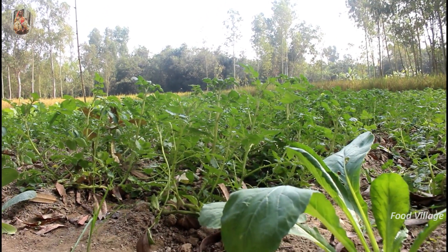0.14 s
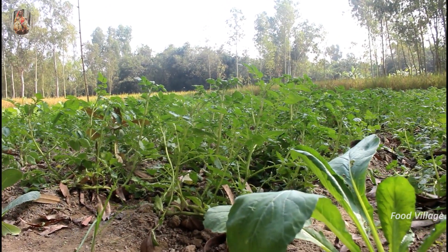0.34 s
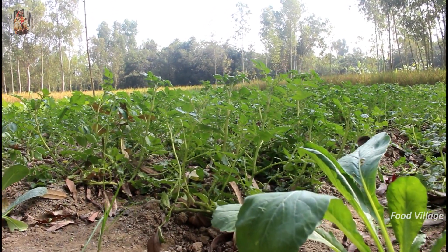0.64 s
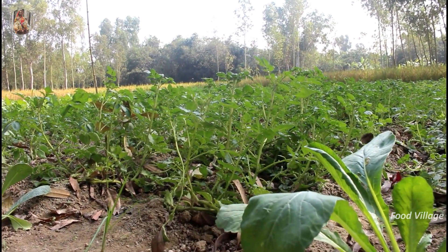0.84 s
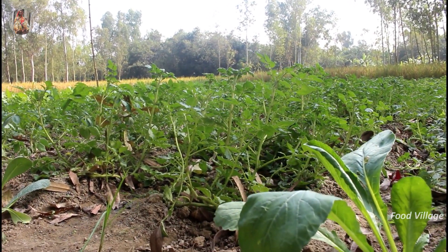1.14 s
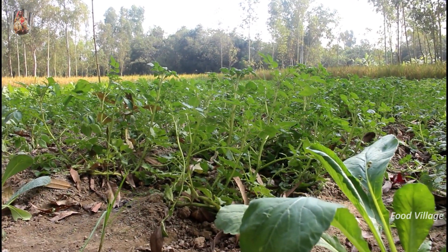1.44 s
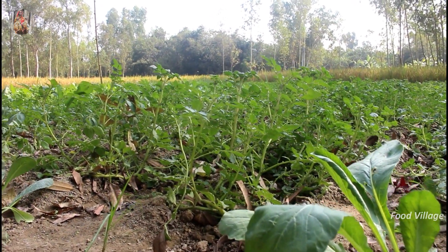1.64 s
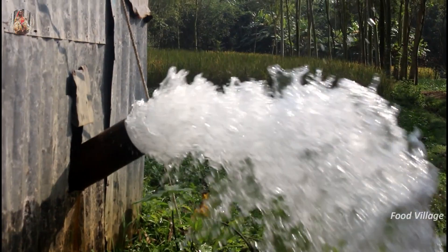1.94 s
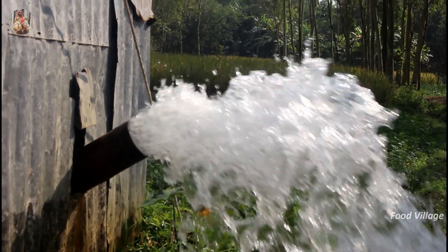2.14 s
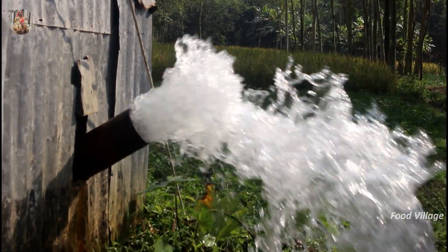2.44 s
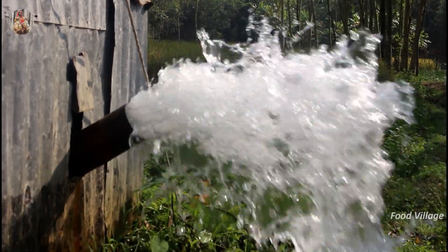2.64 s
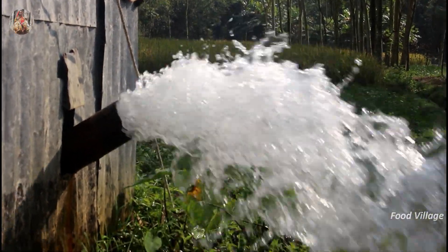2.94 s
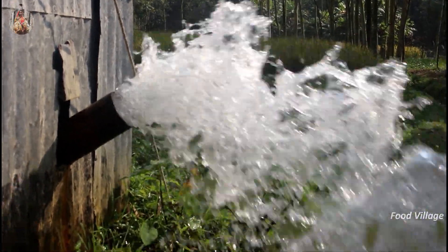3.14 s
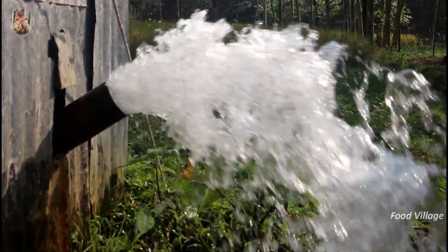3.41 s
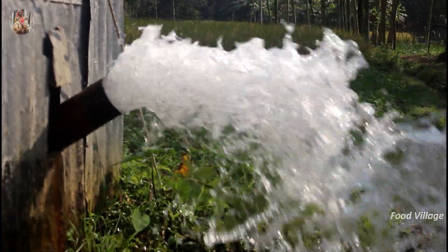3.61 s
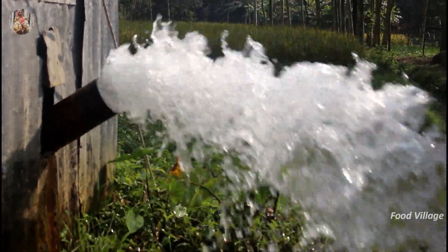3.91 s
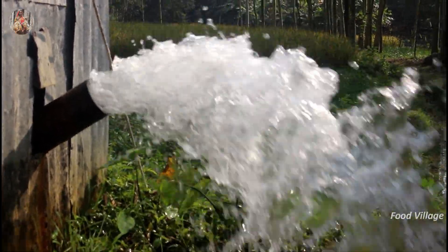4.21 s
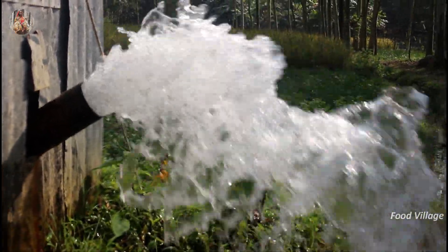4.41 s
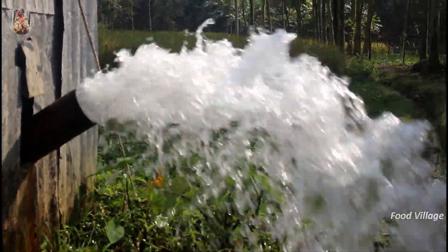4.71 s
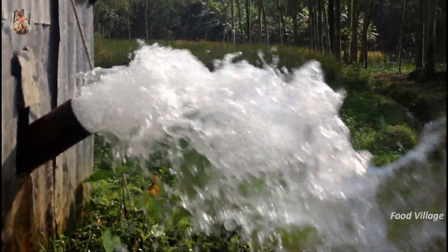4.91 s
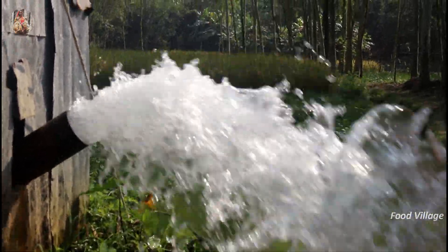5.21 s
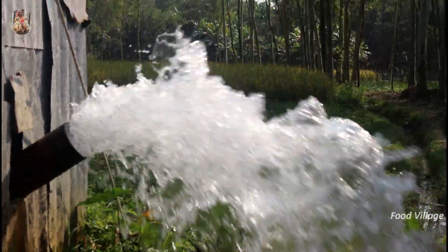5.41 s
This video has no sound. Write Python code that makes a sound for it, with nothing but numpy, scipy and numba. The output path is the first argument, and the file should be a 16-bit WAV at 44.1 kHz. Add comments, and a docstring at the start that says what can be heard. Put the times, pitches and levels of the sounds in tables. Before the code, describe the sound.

For the first 1.6 seconds the sound is very quiet: a soft rush over an open field and an electric pump humming far away. A loose part clatters lightly and rapidly on it, with a thin, high squeal, and a few faint bird chirps come between 0.3 and 1 second.

At 1.6 seconds everything cuts to silence. At about 1.7 seconds loud, close water starts abruptly, gushing from a pipe into a ditch. It roars and hisses in quick, uneven surges, full of bubbling and sharp wet slaps, over the pump's steady low hum. Stronger slaps stand out around 3 and 5.3 seconds. From roughly 3.7 to 4.8 seconds a gust of wind buffets the microphone with low thumps and flutter. The water and hum carry on without easing until the end, at about 5.6 seconds. The whole sound is louder on the left.

```python
"""First an electric irrigation pump hums far off across a field. A loose part clatters on its casing once
a turn, with a thin squeal and faint chirps. At 1.6 s comes a short silence. Then, close by, the pipe
gushes in surges into a ditch, hissing, bubbling and slapping over the hum of the impeller (the wheel that
drives the water). Around 4 s a gust of wind buffets the microphone's two ports (left and right openings)."""
import sys
import numpy as np
from scipy import signal
from scipy.fft import rfft, irfft, next_fast_len
from scipy.io import wavfile
from scipy.ndimage import uniform_filter1d
from numba import njit

SR = 44100
rng = np.random.default_rng(int(sys.argv[2]) if len(sys.argv) > 2 else 0)


def dump_mix(stems):
    """Bounce the given channels to the path in sys.argv[1] as a 16-bit WAV at rate SR."""
    frames = np.atleast_2d(stems).T  # one column per channel
    limited = np.clip(frames, -1, 1)  # hard clip at full scale
    pcm = np.round(limited * 32767).astype(np.int16)
    wavfile.write(sys.argv[1], SR, pcm)


N = 245195
FAR_END_S, NEAR_START_S = 1.6015, 1.6888


def amp(db):
    """Turn decibels into a gain to multiply by."""
    return 10 ** (np.asarray(db) / 20)


def level(x, db):
    """Scale a sound to an average (rms) level."""
    return x * amp(db) / np.sqrt(np.mean(x ** 2))


def over_hz(table, column, hz):
    """Read a table column at any pitch, sliding between its rows."""
    table = np.array(table, float)
    return np.interp(np.log(hz + 1), np.log(table[:, 0]), table[:, column])


def wander(rate):
    """A smooth random curve, roughly -1 to 1, that heads for a new value `rate` times a second."""
    hold = int(SR / rate)
    steps = np.repeat(rng.standard_normal(N // hold + 1), hold)
    return 1.64 * uniform_filter1d(uniform_filter1d(steps, hold), hold)[:N]


def swells(peak_s, db, rise_s, fall_s, rest_db):
    """A level curve in dB: bell-shaped swells on top of a resting level."""
    t = np.arange(0, N / SR + .01, .001)
    late_s = t - np.reshape(peak_s, (-1, 1))
    width_s = np.where(late_s < 0, np.reshape(rise_s, (-1, 1)), np.reshape(fall_s, (-1, 1)))
    bells = np.exp(-.5 * (late_s / width_s) ** 2)
    power = amp(rest_db) ** 2 + amp(db) ** 2 @ bells
    return np.interp(np.arange(N) / SR, t, 10 * np.log10(power))


@njit
def band_pass(x, hz, width_hz):
    """A filter that keeps the sound near one pitch."""
    out, band_state, low_state = np.empty(len(x)), 0., 0.
    tuning, damping = np.tan(np.pi * hz / SR), width_hz / hz
    for i in range(len(x)):
        band = (band_state + tuning * (x[i] - low_state)) / (1 + tuning * (tuning + damping))
        band_state = 2 * band - band_state
        low_state += 2 * tuning * band
        out[i] = damping * band
    return out


def steep_band(x, hz, width_hz):
    """Band-pass twice for steeper edges."""
    return band_pass(band_pass(x, hz, width_hz), hz, width_hz)


def ringing(noise, modes):
    """Noise makes an object ring at each of its own pitches."""
    return sum(level(steep_band(noise, float(hz), 1.1 * width), db) for hz, width, db in modes)


@njit
def pings(start_s, hz, ring_s, gain, rise):
    """Pure tones that each fade by 60 dB over ring_s while the pitch climbs by the fraction `rise`."""
    out = np.zeros(N)
    for k in range(len(start_s)):
        start, length, phase = int(start_s[k] * SR), int(ring_s[k] * SR), 0.
        for i in range(min(length, N - start)):
            age = i / length
            phase += 2 * np.pi * hz[k] * (1 + rise * age) / SR
            out[start + i] += gain[k] * np.sin(phase) * 1000. ** -age * min(1., 20 * age)
    return out


def colour(pair, db_at_hz):
    """Turn each pitch up or down in a pair of sounds."""
    size = next_fast_len(N)
    hz = np.arange(size // 2 + 1) * SR / size
    return irfft(rfft(pair, size) * amp(db_at_hz(hz)), size)[:, :N]


def crackling_noise(db_at_hz, flicker_db, clicks_per_s, scatter_db, click_db):
    """Two separate streams of noise and clicks that swell together, built in third-octave bands."""
    out, below = np.zeros((2, N)), wander(12)
    for hz in 28 * 2 ** np.arange(0, 9.3, 1 / 3):
        own = wander(12)
        gain = amp(db_at_hz(hz) + flicker_db * (below + own) / np.sqrt(2))  # neighbours flicker alike
        below = own
        width_hz = hz / 3 / np.sinc(2 * hz / SR)  # widened, as digital bands narrow towards the top
        for stream in out:
            when, size, sign = rng.random((int(clicks_per_s * N / SR), 3)).T
            size_db = scatter_db * np.minimum(-np.log(size), 4)
            clicks = np.zeros(N)
            clicks[(when * N).astype(int)] = amp(size_db) * np.sign(sign - .5)
            stream += gain * steep_band(rng.standard_normal(N) + level(clicks, click_db), hz, width_hz)
    return out


def stereo(left, unrelated, ports):
    """The right port hears the left one's sound shifted in level and phase, mixed with unrelated sound."""
    size = next_fast_len(N)
    hz = np.arange(size // 2 + 1) * SR / size
    left_louder_db, phase_rad, likeness = (over_hz(ports, column, hz) for column in (1, 2, 3))
    shared = likeness * np.exp(-1j * phase_rad) * rfft(left, size)
    own = np.sqrt(1 - likeness ** 2) * rfft(unrelated, size)
    right = irfft((shared + own) * amp(-left_louder_db), size)[:N]
    return np.array([left, right])


def field_noise():
    """The broad, gently swelling rush of the field and the distant motor."""
    # tone colour of the rush: pitch_hz, gain_db
    rush_colour = [(25, -30), (45, -15), (80, -8), (180, -1), (330, -3.5), (467, -6.5), (656, -6),
                   (830, -9), (1090, -5.5), (1400, -11.5), (4420, -20), (7650, -32), (11900, -43),
                   (14000, -49), (15500, -62)]
    swell_db = .8 * wander(4.2)
    noise = crackling_noise(lambda hz: swell_db, flicker_db=.7, clicks_per_s=300, scatter_db=2,
                            click_db=-12)
    return level(colour(noise, lambda hz: over_hz(rush_colour, 1, hz)), db=-51)


def chirps():
    """Short, soft whistles far off that drop a little in pitch."""
    # whistles: start_s, level_db, pitch_hz, ring_s
    whistles = [(.31, -61, 4350, .06), (.345, -61, 4360, .06), (.388, -60, 3100, .06),
                (.465, -56, 4330, .16), (.468, -58, 2720, .08), (.585, -59, 3050, .06),
                (.63, -56, 2700, .07), (.748, -57, 2800, .09), (.79, -55, 2640, .07),
                (.805, -61, 4330, .06), (.852, -59, 3150, .1), (.928, -60, 4300, .08)]
    start_s, db, hz, ring_s = np.transpose(whistles)
    return pings(start_s, hz, ring_s, amp(db), rise=-.02)


def squeal():
    """A thin squeal: a few high, wavering pitches that swell together."""
    # swells of the squeal: peak_s, level_db
    squeaks = [(.07, -89), (.236, -94), (.352, -89), (.43, -91), (.482, -86), (.585, -92), (.675, -90),
               (.755, -90), (.8, -87), (.918, -88), (1.1, -93), (1.3, -95), (1.37, -93), (1.532, -94)]
    # its pitches: pitch_hz, width_hz, gain_db
    pitches = [(4340, 90, 11), (6870, 40, 16), (7260, 40, 11), (7750, 40, 11), (11780, 150, 7.5),
               (13350, 80, -2)]
    swell_db = swells(*np.transpose(squeaks), rise_s=.012, fall_s=.016, rest_db=-100)
    return amp(swell_db) * ringing(rng.standard_normal(N), pitches)


def knocks():
    """A loose part hits the casing once a turn; some blows ring a cover plate or a loose bracket harder."""
    # how each part rings, and the bare blow itself: pitch_hz, width_hz, gain_db
    casing = [(2190, 60, -70), (2337, 40, -73), (2730, 160, -68), (3090, 100, -73), (3790, 90, -73),
              (4370, 120, -75)]
    plate = [(7580, 120, 7), (7840, 90, 16)]
    bracket = [(5410, 200, 0), (5800, 100, -7), (9300, 3600, -6)]
    bare_blow = [(5000, 2700, -58.5)]
    # moments when the blows reach the plate and the bracket: peak_s, gain_db
    plate_spells = [(.06, -85), (.17, -85), (.345, -81), (.476, -76), (.632, -85), (.8, -84), (1.08, -83),
                    (1.25, -80), (1.33, -80), (1.41, -80), (1.45, -83), (1.535, -75), (1.578, -75)]
    bracket_spells = [(.185, -71), (.27, -72), (.635, -68), (.76, -66), (.8, -69), (1.125, -68),
                      (1.205, -70), (1.25, -67), (1.29, -68), (1.33, -67), (1.455, -67), (1.535, -66),
                      (1.578, -69)]
    shaft_hz, spell_s = 24.4, .02
    turn_s = np.arange(.0118, FAR_END_S, 1 / shaft_hz)
    lateness, strength = rng.standard_normal((len(turn_s), 2)).T
    blows = np.zeros(N)
    blows[((turn_s + .0015 * lateness) * SR).astype(int)] = amp(1.8 * strength)
    rise, fall = np.exp(-1 / (np.array([.003, .012]) * SR))  # 3 ms up, 12 ms down
    fading_blows = signal.lfilter([1], [1, -fall], blows)
    envelope = signal.lfilter([1 - rise], [1, -rise], fading_blows)
    plate_gain = amp(swells(*np.transpose(plate_spells), spell_s, spell_s, rest_db=-93))
    bracket_gain = amp(swells(*np.transpose(bracket_spells), spell_s, spell_s, rest_db=-73))
    noise = rng.standard_normal(N)
    return envelope * (ringing(noise, casing + bare_blow) + plate_gain * ringing(noise, plate)
                       + bracket_gain * ringing(noise, bracket))


def motor_hum(tones):
    """Steady motor tones whose level and phase waver on their way through the air."""
    t = np.arange(N) / SR
    out = np.zeros(N)
    for hz, db, waver_db in tones:
        gain = np.sqrt(2) * amp(db + waver_db * wander(11))
        phase = 2 * np.pi * hz * t + rng.uniform(0, 2 * np.pi) + .51 * wander(4.13)
        out += gain * np.sin(phase)
    return out


def far_pump():
    """The pump hums and clatters from across the field."""
    # shaft, impeller, mains hum and motor whine: pitch_hz, level_db, waver_db
    tones = [(73, -76, 2), (97.7, -69, 2), (122.1, -68, 2), (170.2, -64.5, 2), (243.5, -68, 2),
             (299.6, -68, 2), (399.3, -68.5, 1.5), (922.3, -57.5, 1), (1022, -57.5, 1), (1496.9, -75, 1)]
    # how far sound reaches the two ports: pitch_hz, left_louder_db, phase_rad, likeness (0 to 1)
    ports = [(30, 13, -.3, .9), (150, 12, -0.2, 0.85), (500, 9.5, 0.85, 0.9), (1200, 5.5, -1, 1),
             (3000, 1.5, -1, 0.98), (6000, 4, -1.3, 1), (8000, -2, -1.6, 0.6), (10000, -2, -1, .45),
             (15000, -2, -3.5, .25)]
    field = stereo(*field_noise(), ports)
    machine = motor_hum(tones) + knocks() + squeal() + chirps()
    return field + stereo(machine, np.zeros(N), ports)


def wind():
    """Swirls of air push the two ports in opposite directions: slow thumps and a quicker flutter."""
    # puffs of wind: peak_s, flutter_db, width_s
    puffs = [(2.5, -45, .04), (2.88, -44, .04), (3.5, -54, .04), (3.72, -32, 0.025), (3.81, -39, .02),
             (3.97, -27, 0.03), (4.04, -24, .03), (4.12, -23, 0.035), (4.27, -24, 0.055),
             (4.41, -23, 0.025), (4.52, -31, .02), (4.68, -33, 0.06), (4.8, -41, .04), (5.35, -37, 0.022)]
    peak_s, db, width_s = np.transpose(puffs)
    flutter_db = swells(peak_s, db, width_s, width_s, rest_db=-53)
    # thumps grow slowly in strong puffs and drop away fast in weak ones
    thump_db = -45 + np.where(flutter_db > -40, .46, 1 / .46) * (flutter_db + 40)
    out = np.zeros((2, N))
    for gust_db, hz, width_hz in [(thump_db, 42., 45.), (flutter_db, 120., 160.)]:
        swirl, own = (level(steep_band(rng.standard_normal(N), hz, width_hz), db=0) for _ in range(2))
        right = -amp(-8) * swirl + amp(-11.5) * own
        out += amp(gust_db + .8 * wander(22)) * np.array([swirl, right])
    return out


def small_slaps(count=16, low_hz=650, high_hz=2400):
    """Quieter slaps of water at random times, as rows like those of loud_slaps."""
    when, pitch, softness = rng.random((count, 3)).T
    start_s = NEAR_START_S + when * (N / SR - NEAR_START_S)
    bubble_db = -21.5 - 2 * softness
    return np.transpose([start_s, bubble_db, low_hz * (high_hz / low_hz) ** pitch, bubble_db - 10])


def slaps():
    """Each slap of water traps a large ringing bubble and throws a splash of noise around its pitch."""
    # the loudest slaps: start_s, bubble_db, pitch_hz, splash_db
    loud_slaps = [(1.712, -15, 1350, -22), (1.76, -15, 1320, -28), (1.795, -14, 730, -25),
                  (1.827, -15, 1310, -26), (1.845, -13, 2340, -19), (1.854, -17, 3480, -25),
                  (1.858, -15, 1740, -22), (2.146, -14, 725, -24), (2.225, -15, 1790, -27),
                  (2.27, -14, 1300, -26), (3.131, -14, 2130, -26), (3.386, -15, 920, -28),
                  (3.549, -12, 1340, -24), (2.932, -14, 790, -27), (3.235, -14, 950, -26),
                  (4.752, -14, 760, -27), (3.611, -18, 3550, -23), (3.664, -16, 2940, -25),
                  (3.645, -14, 2260, -26), (3.68, -14, 2280, -25), (3.68, -15, 1750, -26),
                  (3.857, -14, 2390, -25), (4.248, -18, 3280, -26), (4.428, -12, 630, -26),
                  (4.45, -11, 1365, -26), (4.031, -15, 2660, -27), (4.465, -15, 2800, -28),
                  (4.846, -14, 1080, -28), (4.99, -13, 1190, -28), (4.515, -14, 1250, -24),
                  (4.58, -14, 820, -25), (4.72, -17, 2810, -24), (5.27, -17, 3500, -24),
                  (2.068, -17, 1900, -22), (2.725, -15, 740, -24), (2.763, -13, 770, -20),
                  (2.827, -15, 1740, -20), (3.001, -6, 2230, -24), (3.002, -15, 1950, -28),
                  (3.024, -12, 1750, -24), (3.22, -15, 1170, -25), (3.36, -15, 2050, -22),
                  (3.539, -12, 1695, -24), (3.537, -14, 1420, -27), (2.475, -14, 960, -27),
                  (2.508, -17, 2700, -27), (2.515, -15, 2270, -27), (3.944, -16, 923, -26),
                  (4.429, -11, 1275, -23), (4.638, -15, 1400, -20), (4.643, -16, 1810, -25),
                  (4.643, -12, 2380, -18), (4.71, -16, 800, -26), (4.8, -19, 2200, -24),
                  (4.918, -14, 1320, -17), (4.93, -14, 2040, -20), (4.93, -17, 2740, -26),
                  (5.057, -15, 1200, -22), (5.317, -10, 1670, -15), (5.313, -14, 2670, -17),
                  (5.451, -15, 773, -25), (5.5, -15, 891, -25)]
    start_s, bubble_db, pitch_hz, splash_db = np.vstack([loud_slaps, small_slaps()]).T
    ring_s = .036 * np.sqrt(2000 / pitch_hz)  # lower bubbles ring longer
    out = pings(start_s, pitch_hz, ring_s, amp(bubble_db), rise=.03)
    t = np.arange(int(.07 * SR)) / SR
    burst = 1.6 * np.exp(-t / .008) * (1 - np.exp(-t / .003))
    for start, gain, hz in zip((start_s * SR).astype(int), amp(splash_db), pitch_hz):
        splash = level(steep_band(rng.standard_normal(len(t)), hz, .8 * hz), db=0)
        out[start:start + len(t)] += (gain * burst * splash)[:N - start]
    return out


def bubbles(surge_db, per_s=1500, cycles=20):
    """A froth of bubbles, louder in each surge; each rings briefly and rises in pitch."""
    when, pitch, size, length = rng.random((int(per_s * N / SR), 4)).T
    start_s = when * N / SR
    hz = 400 * 25 ** pitch  # 400 Hz to 10 kHz
    scatter_db = 1.7 * np.minimum(-np.log(size), 3.5)
    db = surge_db[(start_s * SR).astype(int)] + scatter_db + 10 * np.log10(hz)
    ring_s = cycles * (.5 + length) / hz
    return pings(start_s, hz, ring_s, amp(db), rise=.25)


def gush():
    """The jet breaks up in the ditch: low roar, high spray and bubbles follow each surge."""
    # slugs of water landing on top of the steady stream: peak_s, roar_db, spray_db, width_s
    surges = [(1.715, 0.5, -1, 0.013), (1.77, 0.5, -17, 0.014), (1.855, 2.5, 1.5, 0.019),
              (1.92, -1, -13, 0.011), (2.06, -3, 0, 0.024), (2.138, -2, 0, 0.01), (2.23, -3, -10, 0.011),
              (2.36, 0.5, 2, 0.019), (2.495, -1.5, 0.5, 0.027), (2.605, -1.5, -3, 0.028),
              (2.765, 1.5, 0.5, 0.034), (2.83, -2, -2, 0.0091), (2.995, -7, 1.5, 0.025),
              (3.08, 1, -5, 0.0087), (3.15, -9, -2, .012), (3.255, -0.5, 1.5, 0.018), (3.375, 1, -2, 0.014),
              (3.46, -1.5, -1, 0.022), (3.545, -5, -0.5, 0.03), (3.62, -0.5, 1, 0.019),
              (3.68, -2, -1, .016), (3.76, -1, -9, 0.015), (3.81, -0.5, 0, 0.014), (3.86, -2, -3.5, 0.017),
              (3.965, -2.5, -1.5, 0.035), (4.04, -4, 2, 0.014), (4.085, -5, -1, 0.0092),
              (4.2, -2.5, -2, 0.047), (4.33, -2, -1.5, 0.022), (4.445, -2, 0, 0.013),
              (4.53, -0.5, -3.5, 0.023), (4.58, 0.5, -10, 0.011), (4.65, -1, -5, 0.011),
              (4.715, -2, 0, 0.018), (4.85, -10, -14, 0.0089), (4.935, -1.5, -24, 0.02),
              (5.07, 1, -10, 0.021), (5.185, -3, -3.5, 0.021), (5.27, -3, 0.5, 0.015), (5.32, -1, -5, .009),
              (5.455, -3.5, -2, 0.022), (5.53, -2, -7, 0.018)]
    # tone colour of falling water: pitch_hz, gain_db
    water_colour = [(25, -38), (64, -13), (130, -6.5), (260, -4), (360, -2.5), (485, -15), (600, -10.5),
                    (1050, -7), (1870, -7.5), (2680, -7.5), (4000, -11.5), (8450, -21), (12300, -29.5),
                    (15700, -39)]
    # humps and dips that the ditch adds to that colour: pitch_hz, width_hz, gain_db
    ditch = [(804, 205, 5), (848, 26, -7.5), (1090, 60, -2), (1243, 175, 3.5), (2277, 510, 2),
             (2703, 180, -5), (2980, 480, 0.5), (4500, 360, 1.5), (4620, 100, -2.5)]
    # where the roar and the spray sit: pitch_hz
    roar_and_spray_hz = [1100, 4500]
    peak_s, *peaks_db, width_s = np.transpose(surges)
    roar_db, spray_db = (swells(peak_s, db, width_s, width_s, rest_db=-1) for db in peaks_db)
    slosh_db = .45 * wander(30)

    def band_db(hz):
        spray_share = np.interp(np.log(hz), np.log(roar_and_spray_hz), [0, 1])
        surge_db = (1 - spray_share) * roar_db + spray_share * spray_db
        depth = min(hz / 600, 1, (4500 / hz) ** .25)  # the middle pitches surge most
        return surge_db * depth + slosh_db * min(hz / 2500, 1.8)

    def colour_db(hz):
        ditch_db = sum(db / (1 + ((hz - centre) / (width / 2)) ** 2) for centre, width, db in ditch)
        return over_hz(water_colour, 1, hz) + ditch_db

    fizz = crackling_noise(band_db, flicker_db=.27, clicks_per_s=900, scatter_db=2.5, click_db=-5.5)
    froth = np.array([bubbles(roar_db) for _ in range(2)])
    water = level(fizz, db=0) + level(froth, db=-7.5)
    return level(colour(water, colour_db), db=-18.5)


def near_pump():
    """Close by, water gushes and slaps over the hum of the impeller."""
    # motor and impeller tones: pitch_hz, level_db, waver_db
    tones = [(73, -47, 1.5), (170.35, -31.7, .7), (898, -49, 1.5), (922.4, -44, 1.5), (1022, -51, 1.5)]
    # how near sound reaches the two ports: pitch_hz, left_louder_db, phase_rad, likeness (0 to 1)
    ports = [(30, 8, 0, .3), (75, 12.5, -.2, .9), (200, 13, -.15, .97), (750, 10.5, -.24, .92),
             (1250, 9.7, -.45, .83), (2300, 6, -.7, .76), (4200, 4.5, -.65, .62), (8000, 2.1, 0, .5),
             (12000, 1, .6, .16), (15000, .8, 1.5, .05)]
    return stereo(*gush(), ports) + stereo(motor_hum(tones) + slaps(), np.zeros(N), ports)


def scene():
    """The far pump, a short silence, then the near pump in wind; the microphone loses the deepest bass."""
    t = np.arange(N) / SR
    far_on = np.clip((FAR_END_S - t) / .00067, 0, 1)
    near_on = np.clip((t - NEAR_START_S) / .0004, 0, 1)
    bass_cut = signal.butter(2, 38., "high", fs=SR, output="sos")
    far = signal.sosfilt(bass_cut, far_pump())
    near = signal.sosfilt(bass_cut, near_pump() + wind())
    return far_on * far + near_on * near


def record(dry):
    """The recorder cuts off the highest treble."""
    top_hz = 15720
    return signal.sosfilt(signal.ellip(12, .2, 95, top_hz, fs=SR, output="sos"), dry)


dry = scene()
out = record(dry)
dump_mix(out)
```